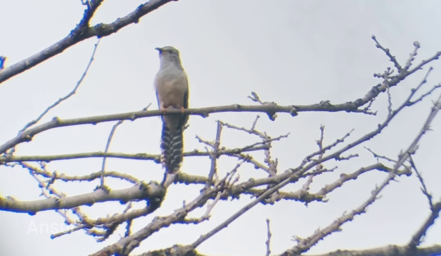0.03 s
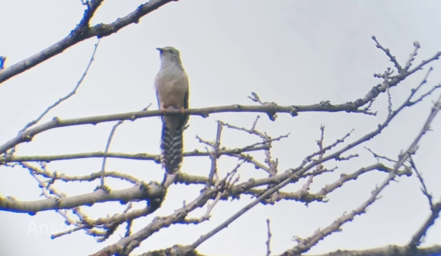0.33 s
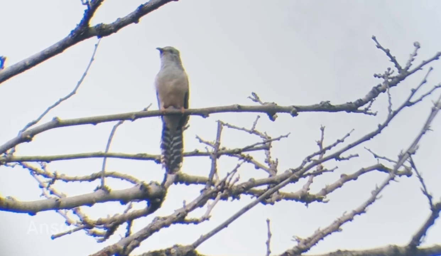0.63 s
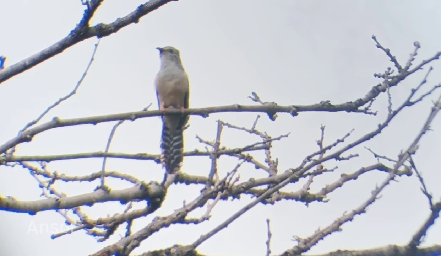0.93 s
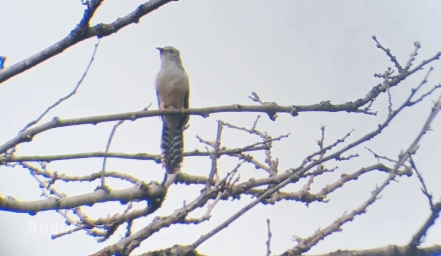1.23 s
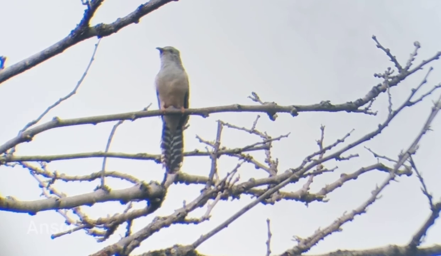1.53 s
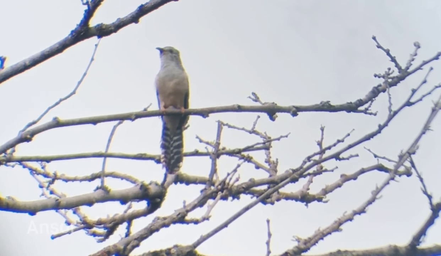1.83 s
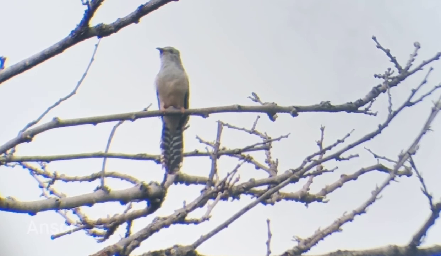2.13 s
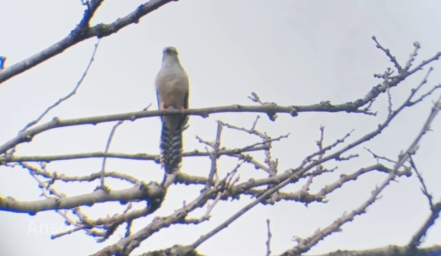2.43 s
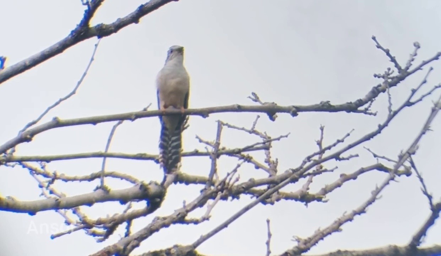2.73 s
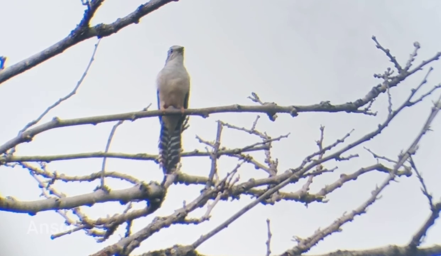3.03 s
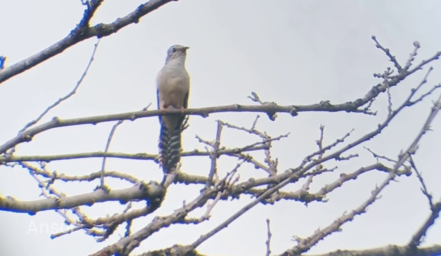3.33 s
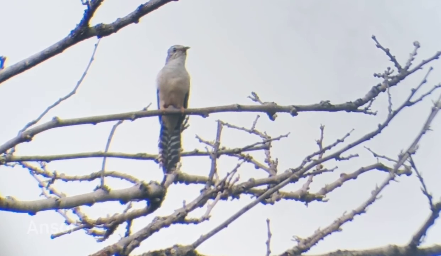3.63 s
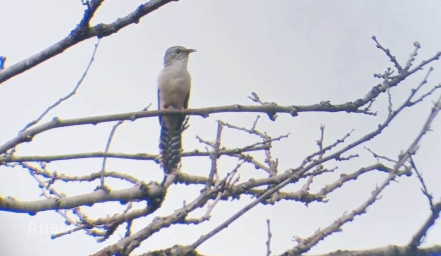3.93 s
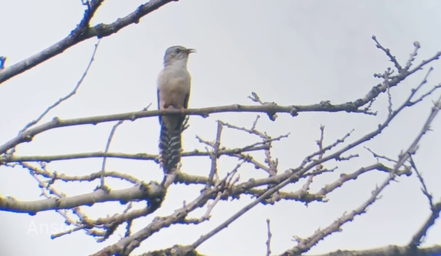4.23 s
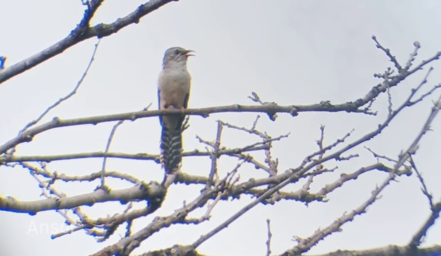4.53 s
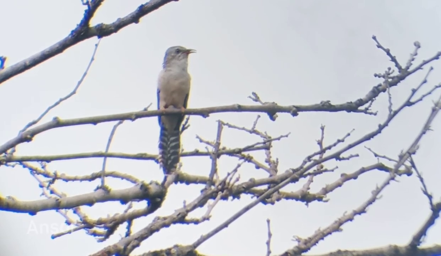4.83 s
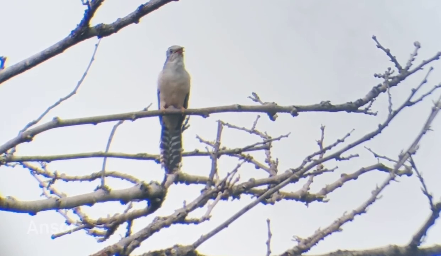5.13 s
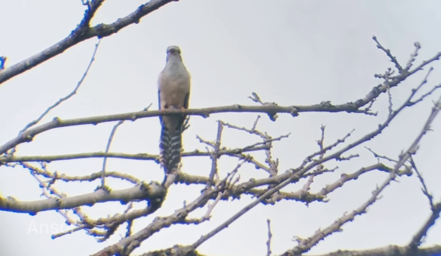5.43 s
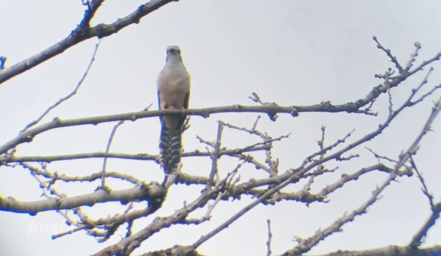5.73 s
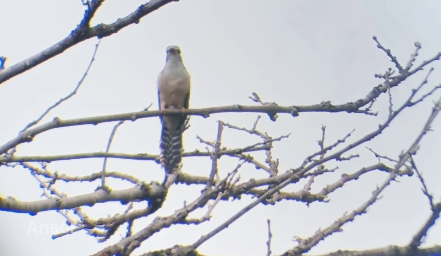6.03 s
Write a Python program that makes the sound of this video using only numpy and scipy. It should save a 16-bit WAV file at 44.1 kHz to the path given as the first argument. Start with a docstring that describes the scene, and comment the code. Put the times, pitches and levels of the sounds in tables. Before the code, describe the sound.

Outdoors among trees, distant engines and tyres make a steady low rumble under a faint hiss. Small songbirds chip, tick and twitter quietly, a far crow caws hoarsely, and something scuffs softly a few times nearby. Late on, a cuckoo on a branch gives two clear rising whistles joined by a short trill. It is the closest bird to the microphone, and the trees add a light echo to the calls.

```python
"""Among trees, with a road in the distance: a cuckoo on a bare branch gives two rising whistles joined
by a short trill, nearly pure tones from its syrinx. Small songbirds chip, tick, rasp and twitter around
it, a far crow caws in hoarse harmonics shaped by its throat, and something scuffs softly nearby.
Engines and tyres rumble throughout under a faint hiss; trunks and branches scatter every call."""
import sys
import numpy as np
from scipy import signal
from scipy.fft import rfft, irfft, next_fast_len
from scipy.io import wavfile
from scipy.ndimage import uniform_filter1d

SR = 44100
rng = np.random.default_rng(int(sys.argv[2]) if len(sys.argv) > 2 else 0)


def bounce(signal):
    """Save signal as a 16-bit WAV file at the path given by the first command-line argument."""
    frames = np.transpose(np.atleast_2d(signal))
    limited = np.clip(frames, -1, 1)
    pcm = np.round(limited * 32767).astype(np.int16)
    wavfile.write(sys.argv[1], SR, pcm)


N = 267775
TIME = np.arange(N) / SR


def undb(db):
    """Decibels to gain."""
    return 10 ** (np.asarray(db) / 20)


def unit(x):
    """Scale to rms 1."""
    return x / np.sqrt(np.mean(x ** 2))


def curves(table):
    """Each column after the time as an automation curve."""
    times, *columns = np.transpose(table)
    return [np.interp(TIME, times, column) for column in columns]


def spectrum_db(points, hz):
    """Read an EQ curve on a log-frequency axis."""
    f, db = np.transpose(points)
    return np.interp(np.log(np.maximum(hz, 1)), np.log(f), db)


def noise(points):
    """Noise of rms 1, coloured by an EQ curve."""
    size = next_fast_len(N + N % 2, real=True)
    bins = rfft(rng.standard_normal(size))
    hz = np.arange(len(bins)) * SR / size
    return unit(irfft(bins * undb(spectrum_db(points, hz)), size)[:N])


def walk(rate):
    """Smooth random modulation of rms 1 that changes about rate times a second."""
    hold = max(int(SR / rate), 2)
    steps = np.repeat(rng.standard_normal(N // hold + 1), hold)
    return unit(uniform_filter1d(uniform_filter1d(steps, hold), hold)[:N])


def phase_of(hz):
    """Running phase of a moving frequency."""
    return 2 * np.pi * np.cumsum(hz) / SR


def note(start, length, time=TIME, attack=0.011):
    """Progress u (0-1) through a note, and its envelope: quick attack, rounded release."""
    u = np.clip((time - start) / length, 0, 1)
    onset = np.clip((time - start) / np.minimum(attack, length / 2), 0, 1)
    return u, onset * (1 - u ** 4)


def arc(u, first, middle, last):
    """A smooth pitch bend through three values."""
    return first + (last - first) * u + (2 * middle - first - last) * 2 * u * (1 - u)


def slurs(notes, waver, flicker_db=0, wavers_per_s=250):
    """Short sine notes, each one unsteady pitch bend; level flicker makes them ragged."""
    out = np.zeros(N)
    unsteady = 1 + waver * walk(wavers_per_s)
    for start, length, first, middle, last, db in notes:
        span = slice(max(int(start * SR), 0), int((start + length) * SR))
        u, envelope = note(start, length, TIME[span])
        hz = arc(u, first, middle, last) * unsteady[span]
        out[span] += undb(db) * envelope * np.sqrt(2) * np.sin(phase_of(hz))
    return out * unit(undb(flicker_db * walk(wavers_per_s)))


def syrinx(hz, db, octave_db, third_db):
    """A bird's nearly pure tone; the octave has its own level, the third harmonic is relative to db."""
    phase = phase_of(hz)
    first, second, third = (np.sqrt(2) * np.sin(k * phase) for k in (1, 2, 3))
    return undb(db) * (first + undb(third_db) * third) + undb(octave_db) * second


# The cuckoo's two rising, swelling whistles, one breakpoint list each: t/s, f/Hz, level/dB before trim
CUCKOO_WHISTLES = [
    [(4.35, 2284, -67), (4.375, 2357, -60.5), (4.44, 2620, -54), (4.485, 2687, -47.5), (4.52, 2727, -47.5),
     (4.566, 2754, -42.5), (4.606, 2781, -49), (4.645, 2785, -45.5), (4.69, 2790, -51), (4.715, 2730, -54)],
    [(5.04, 2340, -53), (5.075, 2440, -44), (5.12, 2335, -46), (5.15, 2276, -51.5), (5.2, 2360, -46.5),
     (5.25, 2500, -45.5), (5.3, 2593, -38), (5.342, 2625, -47.5), (5.353, 2683, -35.5),
     (5.398, 2664, -36.5), (5.425, 2590, -52)],
]

def whistle(table, trim_db, octave_db, octave_fade_db, waver=0.00328, edge_s=0.0043):
    """One slurred cuckoo whistle, slightly unsteady in pitch; its faint octave fades towards the end."""
    hz, db = curves(table)
    start, end = table[0][0], table[-1][0]
    u, _ = note(start, end - start)
    gate = np.clip(np.minimum(TIME - start, end - TIME) / edge_s, 0, 1)
    hz = hz * (1 + waver * walk(150))
    return gate * syrinx(hz, db + trim_db, octave_db + octave_fade_db * u ** 2, third_db=-51)


def trill(start_s=4.8425, length_s=0.197, level_db=-53.5, swing_hz=440, rough=0.026):
    """The cuckoo's slowing warble: broad, rough troughs, pointed tops, weak on the slides between."""
    u, envelope = note(start_s, length_s, attack=0.052)
    warbles_per_s = 43 - 41 * u * length_s
    swing = np.cos(phase_of(warbles_per_s * (TIME > start_s)))
    turn = 2 * swing ** 2 - 1  # +1 at tops and troughs, -1 midway
    db = level_db + 1.3 * swing + 3.4 * turn + 2 * walk(400)
    centre_hz = arc(u, 2280, 2730, 2590)
    hz = centre_hz + swing_hz * (swing + 0.17 * turn)
    jitter = 1 + rough * (1 - swing) * walk(900)
    return envelope * syrinx(hz * jitter, db, db - 18, third_db=-36)


# Songbird chip cues: t/s, length/s, start f/Hz, end f/Hz, level/dB; the level 4150 Hz row at 3.408 s is the
# 3.402 s tick fluttering back from the trees
CHIP_CUES = [(0.245, 0.085, 3700, 4100, -64), (0.359, .048, 4580, 4210, -71),
             (0.406, 0.046, 4140, 5100, -64), (0.801, 0.044, 4140, 4160, -60.5),
             (2.122, 0.067, 4170, 4050, -70), (2.325, 0.055, 3260, 3250, -59),
             (2.689, 0.066, 4330, 4260, -60), (2.724, 0.085, 4350, 3400, -64),
             (2.942, 0.046, 4600, 4310, -69), (3.012, .02, 5200, 3600, -68.5),
             (3.051, 0.033, 4900, 3500, -65.5), (3.329, 0.064, 2890, 3475, -66),
             (3.408, 0.084, 4150, 4150, -70), (3.522, 0.024, 5200, 3120, -64.5),
             (3.642, 0.045, 3010, 3280, -64), (3.852, .11, 4650, 3560, -69),
             (3.947, 0.016, 2920, 3390, -61.5), (4.29, 0.1, 2980, 3150, -66),
             (4.54, 0.061, 3710, 3180, -65), (5.577, 0.017, 4100, 4000, -59.5),
             (5.71, 0.026, 4060, 3800, -68)]

def chips(arch_hz=133, steep_hz_per_s=28000):
    """Short glides up or down, bowed upwards in the middle; the steepest turn ragged."""
    smooth, steep = [], []
    for start, length, first, last, db in CHIP_CUES:
        kind = steep if abs(last - first) / length > steep_hz_per_s else smooth
        kind.append((start, length, first, (first + last) / 2 + arch_hz, last, db))
    clean = slurs(smooth, waver=.013, flicker_db=2)
    return clean + slurs(steep, waver=0.045, flicker_db=5, wavers_per_s=330)


# Sharp songbird tick cues: t/s, lowest f/Hz, level/dB
TICK_CUES = [(2.806, 4180, -54.5), (3.402, 4150, -61.5), (3.576, 3900, -70), (3.981, 3535, -52.5),
             (4.028, 4170, -61.5), (4.06, 3820, -61.5), (4.105, 3820, -58.5)]

def ticks(length_s=0.0276, dive_hz=810):
    """Tiny notes whose pitch dives and springs back."""
    notes = [(start, length_s, hz + dive_hz, hz, hz + dive_hz, db) for start, hz, db in TICK_CUES]
    return slurs(notes, waver=0.0076)


# Songbird twitter cues: t/s, length/s, centre f/Hz, level/dB, warble rate/Hz
TWITTER_CUES = [(2.74, 0.074, 4250, -65, 55), (3.558, 0.1, 4230, -65.5, 125), (3.962, 0.2, 4375, -67, 48),
                (4.713, 0.19, 4200, -66.5, 48), (4.87, 0.24, 4430, -71.5, 36)]

def twitters(swing_hz=476, stray_hz=190, uneven=0.27, throb_db=2, flicker_db=3.5):
    """Bursts of quick, ragged zigzags in pitch, loudest at the bottom of each."""
    out = 0
    for start, length, hz, db, rate in TWITTER_CUES:
        _, envelope = note(start, length)
        swing = np.sin(phase_of(rate * (1 + uneven * walk(60))))
        tone = np.sqrt(2) * np.sin(phase_of(hz + swing_hz * swing + stray_hz * walk(350)))
        out += envelope * undb(db - throb_db * swing + flicker_db * walk(200)) * tone
    return out


# Songbird rasp cues: t/s, length/s, low band f/Hz, high band f/Hz, level/dB, high band relative level/dB
RASP_CUES = [(0.02, 0.29, 2980, 5700, -68, -13), (3.223, 0.066, 3170, 6160, -66.5, -10.5),
             (5.901, 0.26, 2970, 5900, -72.5, 0)]

def rasps(width=1.35, flutter_db=1.1):
    """Hoarse calls: fluttering hiss in two resonances."""
    def band(hz):
        return noise([(hz / width ** 2, -45), (hz / width, -10), (hz, 0),
                      (hz * np.sqrt(width), -5), (hz * width ** 2, -45)])

    out = 0
    for start, length, low_hz, high_hz, db, high_db in RASP_CUES:
        _, envelope = note(start, length, attack=0.035)
        hiss = band(low_hz) + undb(high_db) * band(high_hz)
        out += envelope * undb(db + flutter_db * walk(160)) * hiss
    return out


# One songbird's repeated note: t/s, start f/Hz, level/dB
FALL_CUES = [(0.669, 5030, -69.5), (1.655, 5020, -71.5), (2.599, 4960, -72.5), (4.19, 4990, -73)]

def falls(length_s=.18, midway_drop_hz=185, drop_hz=766):
    """A thin tone that falls ever faster."""
    notes = [(start, length_s, hz, hz - midway_drop_hz, hz - drop_hz, db) for start, hz, db in FALL_CUES]
    return slurs(notes, waver=0.0036)


# Distant caw cues: t/s, length/s, f/Hz, level/dB, jitter/fraction of pitch, tilt/dB per octave
CAW_CUES = [(-.02, 0.26, 591.6, -70, .03, -3), (1.347, 0.2, 462.6, -68.5, .022, 2),
            (4.328, 0.287, 542, -66.5, 0.01, 0), (4.756, 0.22, 565.5, -61.5, .024, -.5)]
# Formants of the crow's throat: f/Hz, relative level/dB
CROW_FORMANTS = [(470, -6), (610, -1), (900, 0), (1120, 2.5), (1750, 0), (2200, -0.5), (2800, -9),
                 (3500, -6), (4600, -17)]

def crow(droop=.05, wander=0.011, flicker_db=4.0, harmonics=8):
    """Hoarse, arching caws: a jittering harmonic stack shaped by the throat, each partial flickering."""
    out = 0
    for start, length, hz, db, jitter, tilt_db in CAW_CUES:
        u, envelope = note(start, length)
        unsteady = 1 + jitter * walk(500) + wander * walk(50)
        phase = phase_of(hz * arc(u, 1 - droop, 1, 1 - droop) * unsteady)
        voice = 0
        for k in range(1, harmonics + 1):
            partial_db = spectrum_db(CROW_FORMANTS, k * hz) + tilt_db * np.log2(k)
            voice += undb(partial_db + flicker_db * walk(70)) * np.sin(k * phase)
        out += undb(db + 4.4 * walk(160)) * envelope * unit(voice)
    return out


# Far birds' whistle cues: t/s, length/s, middle f/Hz, level/dB
FAR_WHISTLE_CUES = [(0.011, 0.08, 3310, -69), (0.028, .17, 5240, -77), (0.035, 0.064, 2480, -65.5),
                    (.05, .11, 4630, -83), (.08, 0.13, 1537, -76), (.55, 0.36, 1532, -78),
                    (1.13, .2, 1550, -76), (1.35, .16, 1845, -69), (1.55, 0.13, 1650, -66),
                    (2.004, 0.12, 1944, -59), (2.09, 0.082, 1532, -70), (2.193, 0.23, 1680, -67),
                    (2.418, 0.2007, 1658, -65.5), (2.577, 0.12, 1946, -62), (3.121, .1, 1925, -65),
                    (3.13, 0.11, 1715, -67), (3.131, 0.15, 1480, -67), (4.839, 0.095, 2098, -59),
                    (5.52, 0.056, 1810, -65), (5.84, 0.18, 1504, -71)]

def far_whistles(sag_hz=18.3):
    """Thin, wavering, nearly level notes that sag a little."""
    notes = [(start, length, hz + sag_hz, hz, hz - sag_hz, db)
             for start, length, hz, db in FAR_WHISTLE_CUES]
    return slurs(notes, waver=.02)


# Soft scuff cues: peak t/s, rise/s, decay/s, level/dB, body relative level/dB
SCUFF_CUES = [(1.45, 0.04, 0.16, -74, -6), (2.079, 0.036, 0.045, -57.5, -10),
              (2.614, 0.036, 0.037, -56.5, -2), (3.16, 0.042, 0.062, -61.5, -25),
              (5.62, 0.085, 0.037, -70.5, 9.5)]
# EQ of the rub and of its low body: f/Hz, relative level/dB
RUB_EQ = [(600, -20.5), (1200, -9), (1380, -12), (1540, -3.5), (1950, -1), (2230, -4), (2450, -6.5),
          (3150, -7), (3550, -20), (4150, -8.5), (5200, -29), (7500, -33), (11000, -52)]
BODY_EQ = [(200, -46), (480, 22), (850, 18), (1300, -46)]

def scuffs(grain_db=2.5):
    """Grainy rubbing that swells and dies, some with a dull body."""
    rub = noise(RUB_EQ) * undb(grain_db * walk(300))
    body = noise(BODY_EQ)
    out = 0
    for peak, rise, decay, db, body_db in SCUFF_CUES:
        envelope = 1 / np.cosh(np.maximum((peak - TIME) / rise, (TIME - peak) / decay))
        out += undb(db) * envelope * (rub + undb(body_db) * body)
    return out


# The far bird bed's balance across pitch: f/Hz, level/dB before the fader
CHORUS_BALANCE = [(700, -75), (1000, -77), (1550, -69.5), (2000, -72.5), (2600, -69), (3400, -73.5),
                  (4400, -76.5), (5000, -90)]
# Its fader ride: t/s, relative level/dB
CHORUS_FADER = [(0, -3), (.9, -4), (2.6, 0), (3.8, -4.5), (4.4, 3), (6.07, -2)]

def chorus(count=1500, bend=0.06, scatter_db=6, shortest_s=0.013, longest_s=0.0524):
    """Many faint, far birds blur into a chatter: short notes at random times and pitches."""
    when, pitch, span, strength, *turns = rng.random((count, 7)).T
    low_hz, high_hz = CHORUS_BALANCE[0][0], CHORUS_BALANCE[-1][0]
    hz = low_hz + pitch * (high_hz - low_hz)
    bends_hz = hz * (1 + bend * (2 * np.array(turns) - 1))
    lengths = shortest_s + span * (longest_s - shortest_s)
    db = spectrum_db(CHORUS_BALANCE, hz) + scatter_db * (strength ** 2 - .5)
    notes = np.column_stack([when * TIME[-1], lengths, *bends_hz, db])
    return slurs(notes, waver=.018) * undb(curves(CHORUS_FADER)[0])


# Far engine cues: t/s, length/s, start, middle and end f/Hz, start and end level/dB,
# octave relative level/dB, throb/dB
ENGINE_CUES = [(-0.08, 2.04, 125, 113.4, 110.7, -43, -33, -19.5, 1.77),
               (.7, 0.86, 44.2, 45.05, 45, -56, -51, 3, 1.5),
               (1.78, 0.52, 129.7, 135.5, 146, -37, -41, -18, 2.2),
               (1.7, 0.41, 168, 174, 180, -42, -43, -22, 3),
               (2.099, 4.75, 46, 50.7, 52.93, -54, -48.5, -3.5, 1.5),
               (2.0, 4.45, 110.9, 114.7, 112, -46, -52, -18.5, 3.5),
               (2, 1, 143, 153, 168, -45, -43, -16.5, 3), (3.5, 2.9, 170, 183, 194, -43, -45, -19, 3),
               (2.5, 3.54, 119.9, 143.2, 156.7, -42, -39, -13, 2.5)]

def engines(fade_s=0.11, waver_per_db=0.0187):
    """Firing notes and their octaves glide as engines slow or pull away; more throb brings more waver."""
    out = 0
    for start, length, first, middle, last, first_db, last_db, octave_db, throb_db in ENGINE_CUES:
        u, _ = note(start, length)
        phase = phase_of(arc(u, first, middle, last) * (1 + waver_per_db * throb_db * walk(15)))
        tone = np.sqrt(2) * (np.sin(phase) + undb(octave_db) * np.sin(2 * phase))
        fade = np.minimum(np.minimum(u, 1 - u) * length / fade_s, 1)
        db = first_db + (last_db - first_db) * u + throb_db * np.minimum(walk(13), 1.4)
        out += fade * undb(db) * tone
    return out


# EQ of the road rumble and of the tyres: f/Hz, relative level/dB
RUMBLE_EQ = [(20, -26.5), (36, -30.5), (55, -11), (72, -8.5), (90, 0.5), (130, 0.5), (175, -1), (215, -6),
             (280, -9.5), (400, -20.5), (700, -70.5)]
TYRE_EQ = [(120, -20.5), (220, 1.5), (290, -2), (370, -11), (470, -15.5), (600, -27.5), (750, -46.5),
           (1200, -74.5)]
# The tyre roar swells as the traffic pulls away: t/s, level/dB
TYRE_FADER = [(0, -57.5), (.7, -60.5), (1.7, -51.5), (2.5, -42.5), (3.0, -48.5), (3.4, -48.5), (4.2, -47.5),
              (6.07, -47.5)]

def traffic(surge_db=3.0, rumble_db=-38):
    """Distant engines and surging tyre roar over the steady rumble of the road."""
    tyres = undb(curves(TYRE_FADER)[0] + surge_db * walk(9)) * noise(TYRE_EQ)
    return engines() + undb(rumble_db) * noise(RUMBLE_EQ) + tyres


# EQ of the open-air bed: f/Hz, relative level/dB
AIR_EQ = [(300, -3.5), (560, 4), (740, -1), (950, -4), (1550, 4), (2000, -1.5), (2700, 0.5), (3500, -6),
          (4400, -16), (5200, -14.5), (6500, -17.5), (7600, -20.5), (9000, -10.5), (10400, -6),
          (11400, -22.5), (16000, -27)]

def air(level_db=-69, sway_db=0.1):
    """A faint, almost steady outdoor hiss."""
    return undb(level_db - sway_db * walk(5.0)) * noise(AIR_EQ)


def trees(dry, twigs_db, tail_db, tail_t60, twigs_t60=0.12):
    """Direct sound, quick scatter from branches and a longer tail from the trees; decay times in s."""
    t = np.arange(SR) / SR
    response = 0
    for db, t60, predelay_s in (twigs_db, twigs_t60, .003), (tail_db, tail_t60, .025):
        scatter = rng.standard_normal(SR) * undb(-60 * t / t60) * (t > predelay_s)
        response += undb(db) * scatter / np.linalg.norm(scatter)
    return dry + signal.fftconvolve(dry, response)[:N]


def scene():
    """Mono mix: the cuckoo up front, most other birds further off and wetter, scuffs and traffic dry."""
    first, second = CUCKOO_WHISTLES
    cuckoo = whistle(first, trim_db=-1.5, octave_db=-73.5, octave_fade_db=-5)
    cuckoo += whistle(second, trim_db=-2.2, octave_db=-78, octave_fade_db=-10)
    birds = trees(cuckoo, twigs_db=-6.5, tail_db=-12.5, tail_t60=0.83, twigs_t60=0.19)
    birds += trees(trill(), twigs_db=-7, tail_db=-9, tail_t60=0.55, twigs_t60=0.24)
    birds += trees(falls(), twigs_db=-8, tail_db=-15, tail_t60=0.8)
    birds += trees(chips() + ticks() + rasps(), twigs_db=-3.5, tail_db=-9.5, tail_t60=0.74)
    birds += trees(twitters(), twigs_db=0.5, tail_db=-9, tail_t60=0.4)
    birds += trees(chorus(), twigs_db=-2, tail_db=-14.5, tail_t60=0.46, twigs_t60=0.13)
    birds += trees(crow() + far_whistles(), twigs_db=-2, tail_db=-5, tail_t60=0.45, twigs_t60=0.23)
    return (birds + scuffs() + traffic() + air())[None]


def record(dry, fade_s=.004, top_hz=15800):
    """A tiny fade at each end and a steep high cut."""
    fade = np.clip(np.minimum(TIME, TIME[-1] - TIME) / fade_s, 0, 1)
    high_cut = signal.ellip(8, .2, 80, top_hz, fs=SR, output="sos")
    return signal.sosfilt(high_cut, dry * fade)


dry = scene()
out = record(dry)
bounce(out)
```